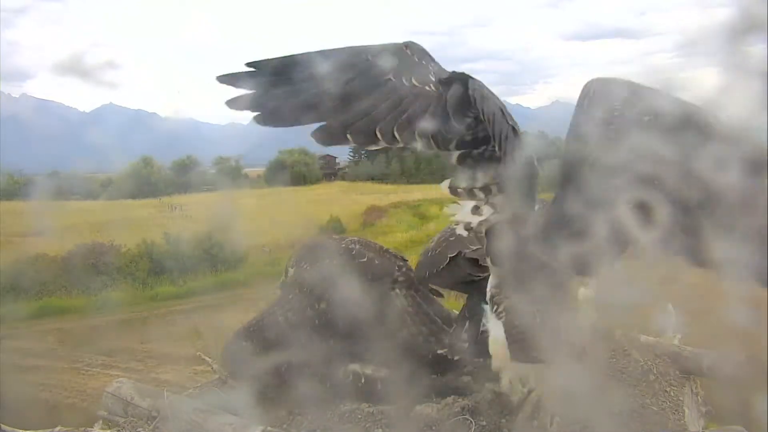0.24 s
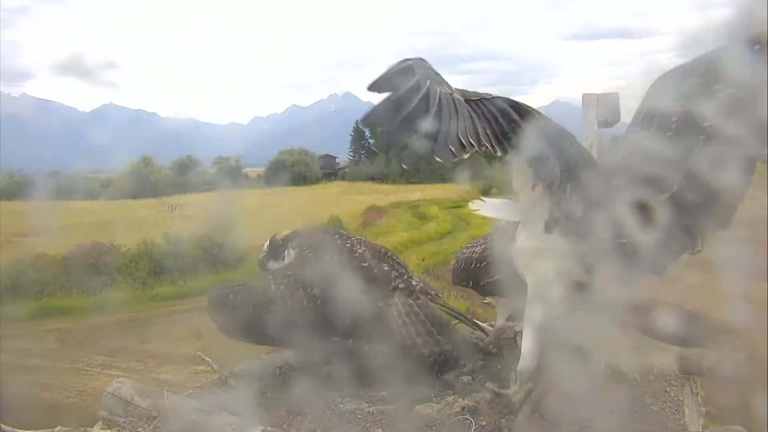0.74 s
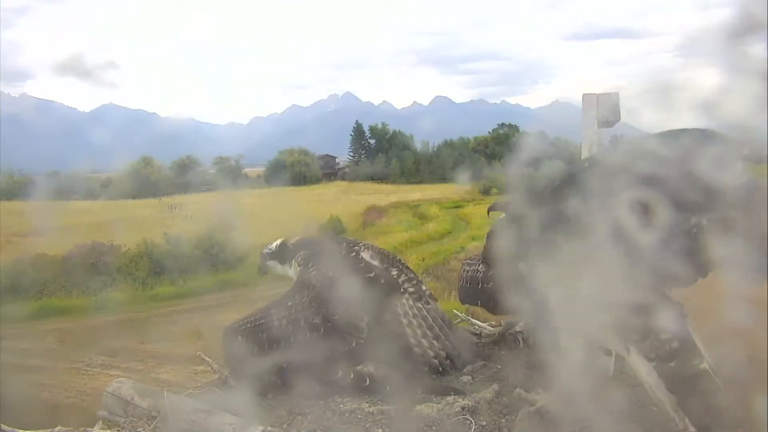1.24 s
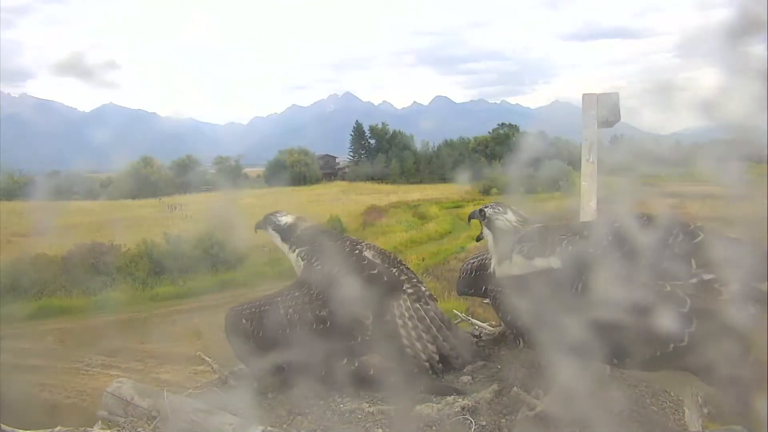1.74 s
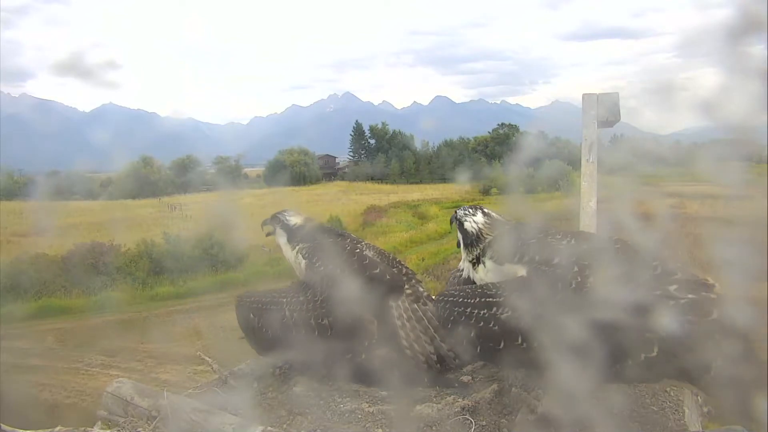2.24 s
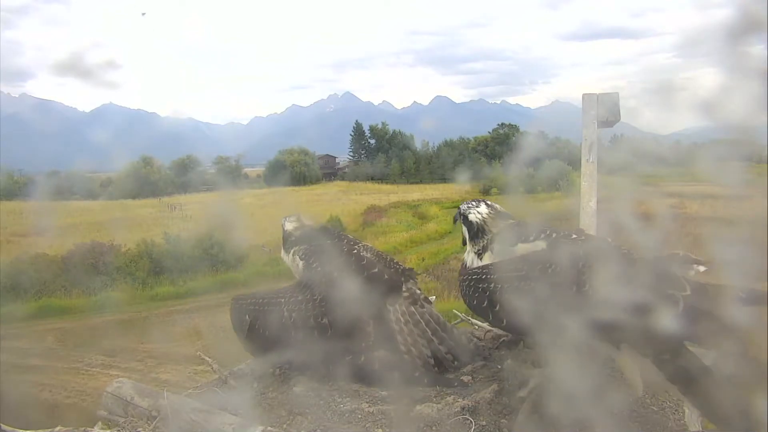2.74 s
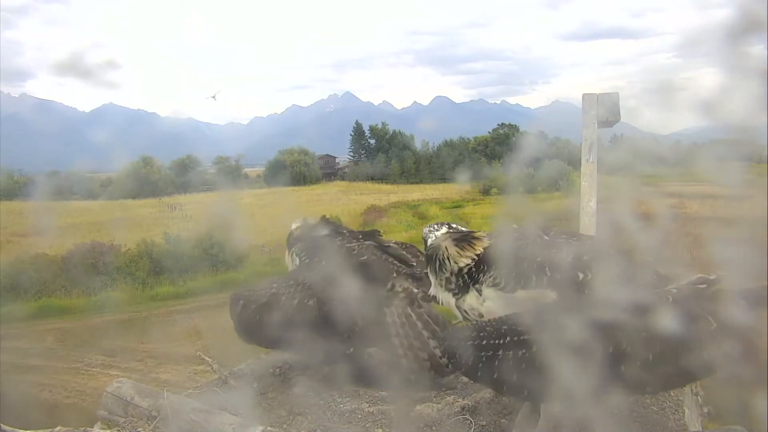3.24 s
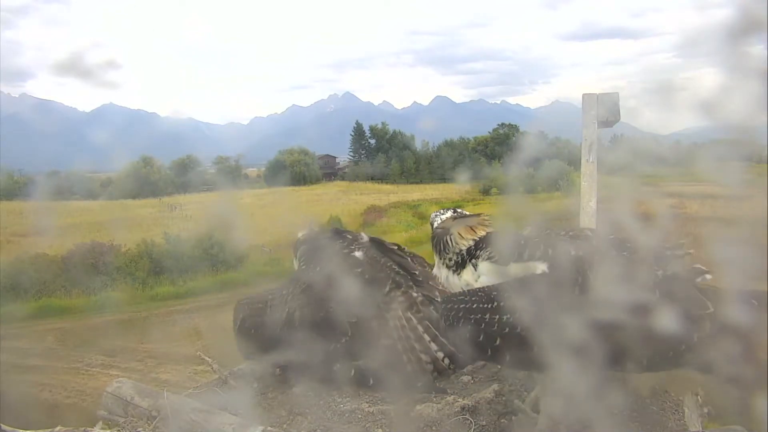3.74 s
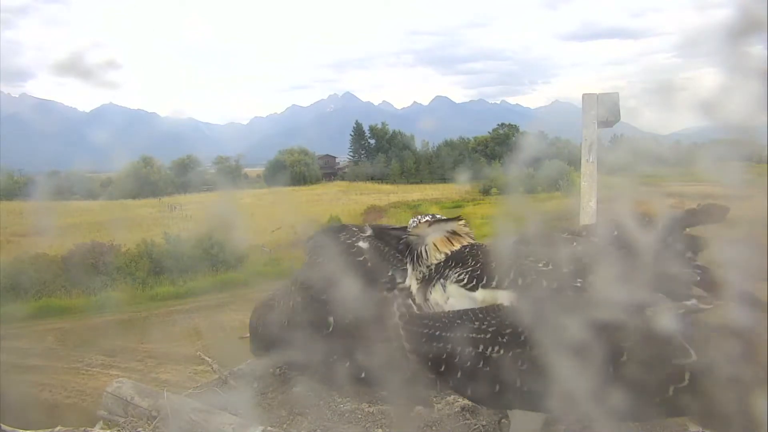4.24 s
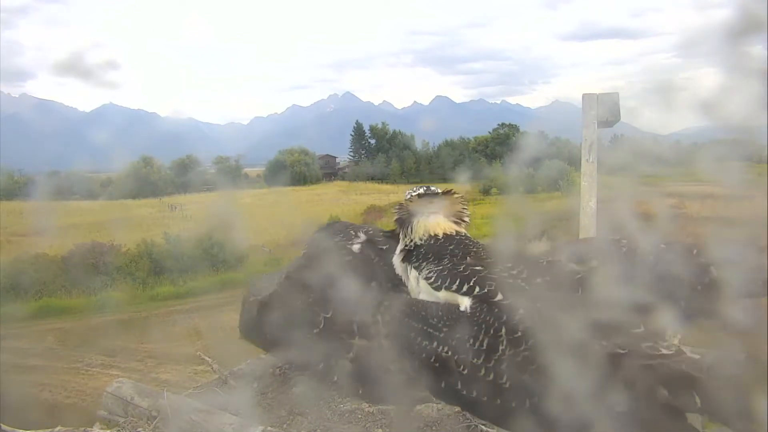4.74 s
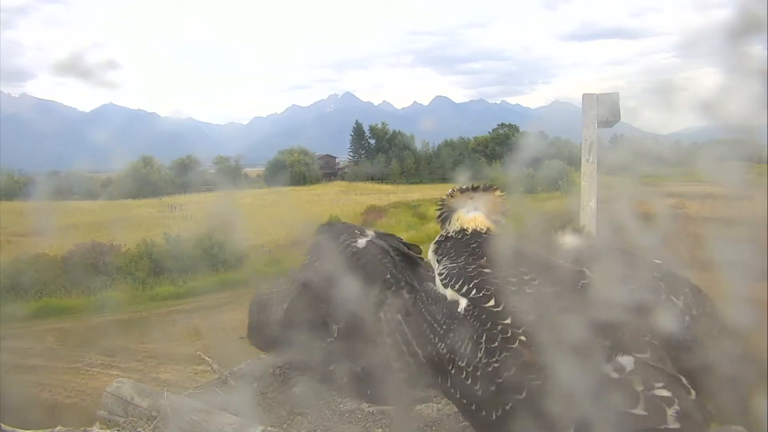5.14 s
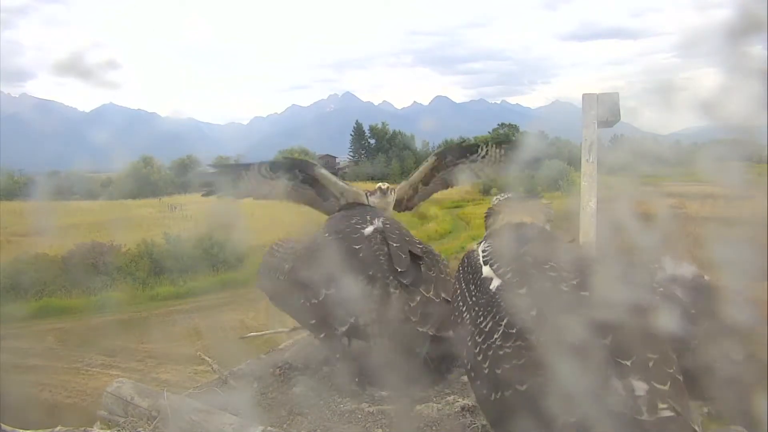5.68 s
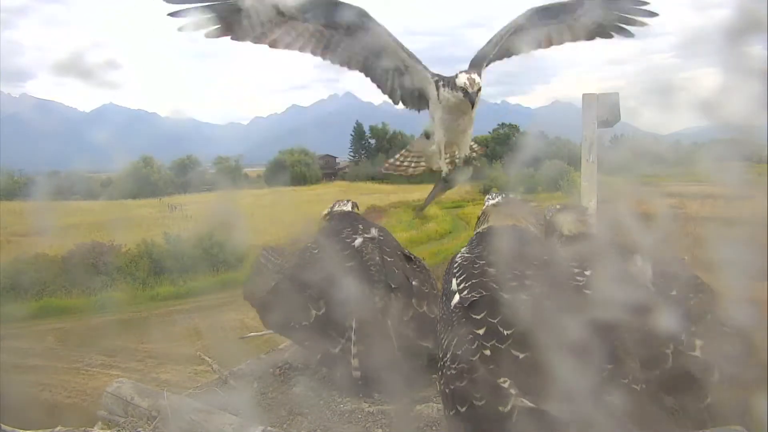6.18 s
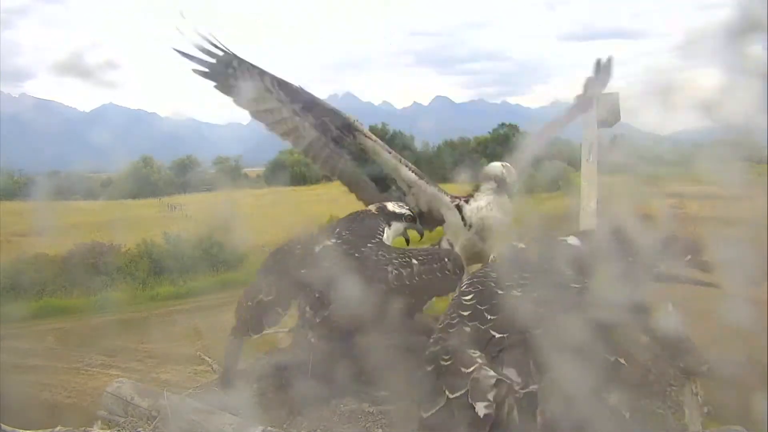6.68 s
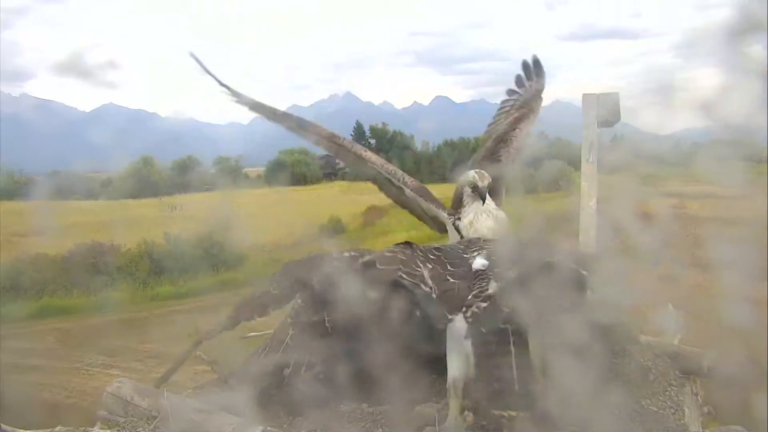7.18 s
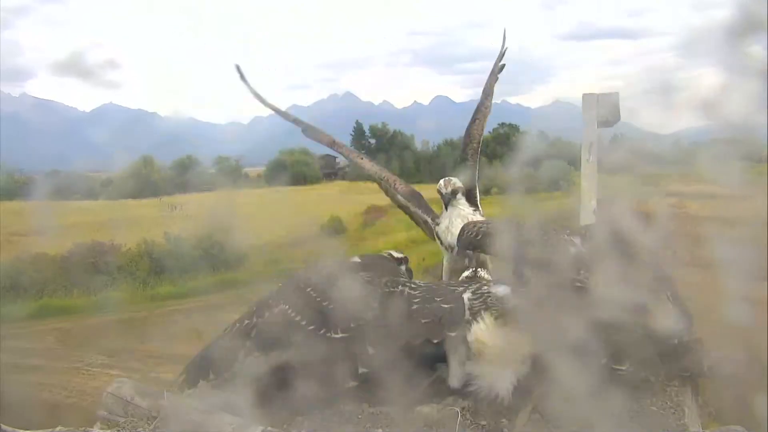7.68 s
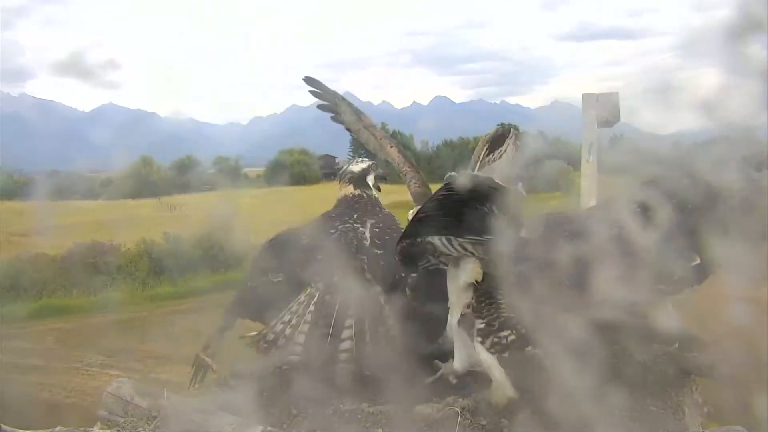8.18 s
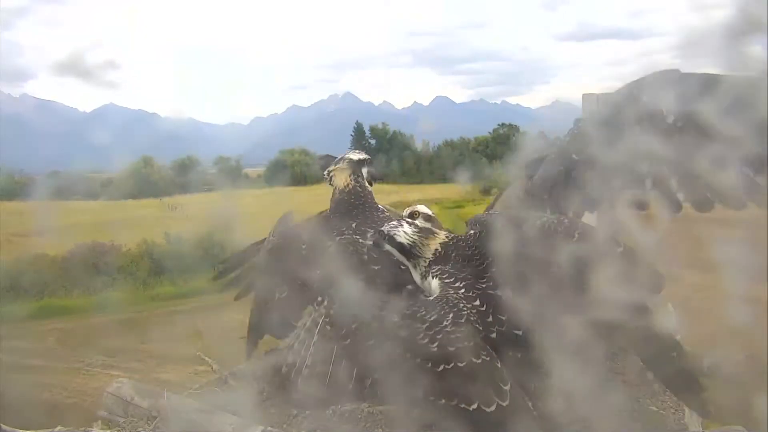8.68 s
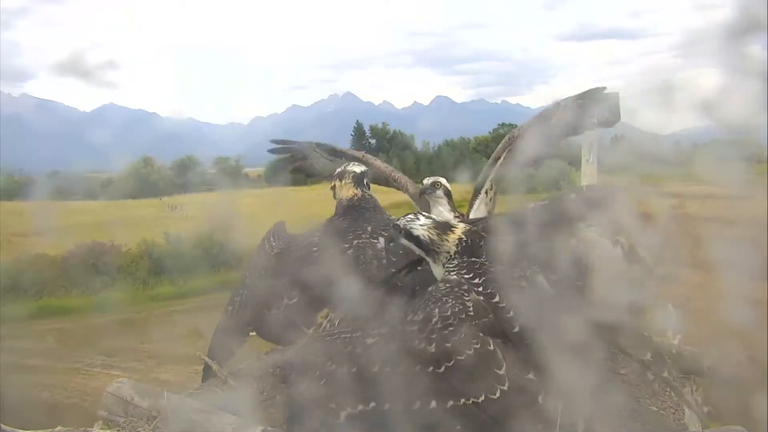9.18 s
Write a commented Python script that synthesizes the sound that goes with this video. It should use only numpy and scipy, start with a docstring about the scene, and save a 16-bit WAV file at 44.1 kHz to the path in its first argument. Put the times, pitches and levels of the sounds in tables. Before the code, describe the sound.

Steady piercing whistles over raspy begging build to a frantic shrill squabble of raptor chicks, then feet and twigs rustle and weak cries trail off.

```python
"""A nest high over open fields: young ospreys beg in clear whistles, hoarse calls and bright screams.
Whistles, cries and squeals are near-sines on bent pitch curves; rasps mix wobbling overtones with
uneven pulses. Feet and wings shuffle as a parent lands, sticks tick and something creaks once: noise,
short knocks and pulses. Filtered noise makes the hiss and the wind rumble at the microphone; the birds
return from the fields as a faint echo."""
import sys
import numpy as np
from scipy import signal
from scipy.fft import rfft, irfft
from scipy.io import wavfile
from scipy.ndimage import uniform_filter1d

SR = 44100
rng = np.random.default_rng(int(sys.argv[2]) if len(sys.argv) > 2 else 0)


def persist_wave(psi):
    """Save psi, clipped to +-1, as 16-bit WAV."""
    counts = np.round(np.clip(psi, -1, 1) * 32767).astype(np.int16)
    wavfile.write(sys.argv[1], SR, np.atleast_2d(counts).T)


N = 415422
EDGE_HZ = 15700  # upper limit of the sound

# clear whistles of the nearest bird: start t/s, end t/s, crest f/Hz, dip f/Hz, top f/Hz,
# crest level/dB, middle level/dB, top level/dB, second harmonic level/dB (against the first)
WHISTLES = [(0.021, 0.376, 3286, 3263, 3493, -22.5, -26, -26, -15.5),
            (0.525, 0.775, 3280, 3227, 3340, -25, -25, -28.5, -22.5),
            (0.897, 1.177, 3260, 3236, 3313, -31, -31.5, -30.5, -14),
            (1.31, 1.694, 3420, 3350, 3447, -30, -31, -27.5, -16.5),
            (1.842, 2.128, 3462, 3398, 3510, -26.5, -26, -28, -15),
            (2.249, 2.567, 3460, 3400, 3497, -28.5, -26.5, -26, -17),
            (2.699, 2.998, 3430, 3373, 3497, -28, -31.5, -29.5, -13),
            (3.125, 3.426, 3430, 3350, 3556, -28.5, -26.5, -29.5, -17.5),
            (3.556, 3.857, 3525, 3420, 3583, -26.5, -26.5, -27.5, -17.5),
            (3.985, 4.261, 3460, 3280, 3440, -27.5, -27.5, -29, -16.5),
            (4.389, 4.713, 3433, 3350, 3504, -27, -31.5, -30, -15),
            (4.85, 5.151, 3404, 3380, 3480, -28, -27.5, -28.5, -14)]
# one uneven, halting whistle at the end: t/s, f/Hz, level/dB
LAST_WHISTLE = [(9.027, 3240, -45), (9.041, 3353, -38), (9.103, 3296, -44.5), (9.135, 3300, -36.5),
                (9.238, 3377, -33), (9.261, 3493, -42.5), (9.311, 3462, -40), (9.34, 3450, -49),
                (9.36, 3460, -40.5), (9.393, 3360, -40.5), (9.405, 3320, -56)]
# moments when the whistle gives way: start t/s, end t/s, level/dB (change)
CRACKS = [(4.027, 4.061, -22), (4.538, 4.596, -6.5), (4.884, 5.113, -9.5)]
# side tones on a whistle: start t/s, end t/s, level/dB (average depth, before it flickers)
SPLITS = [(.09, .15, -19), (.155, .208, -16), (.298, .325, -22), (.6, .675, -24)]
SPLIT_HZ = 1030  # middle of the wandering beat
SCOOP_S, CREST_S, DIP_S = 0.00762, 0.0427, 0.073  # seconds after the start
TOP_S, HOLD_S, DROP_S = 0.087, 0.056, 0.026  # seconds before the end
START_PITCH, SCOOP_PITCH = 0.66, 0.939  # shares of the crest pitch
DROP_PITCH, END_PITCH = 0.97, 0.861  # shares of the top pitch
START_DB, SCOOP_DB, DROP_DB, END_DB = -19.5, -2, 1, -24  # first two against the crest, then the top
LAST_SECOND_DB = -6.5  # second harmonic of the last whistle


def whistles():
    """A scoop to the crest, a dip, a climb and a drop; a second membrane splits the voice at times."""
    out, t = np.zeros(N), np.arange(N) / SR
    for start, end, crest, dip, top, crest_db, middle_db, top_db, second_db in WHISTLES:
        hz, = along([(start, START_PITCH * crest), (start + SCOOP_S, SCOOP_PITCH * crest),
                     (start + CREST_S, crest), (start + DIP_S, dip),
                     (end - TOP_S, top), (end - HOLD_S, top),
                     (end - DROP_S, DROP_PITCH * top), (end, END_PITCH * top)])
        db, = along([(start, crest_db + START_DB), (start + SCOOP_S, crest_db + SCOOP_DB),
                     (start + CREST_S, crest_db), ((start + end) / 2, middle_db),
                     (end - HOLD_S, top_db), (end - DROP_S / 2, top_db + DROP_DB),
                     (end, top_db + END_DB)])
        smooth_hz = uniform_filter1d(hz, size=500, mode="nearest")
        # softer moments are also purer
        tone = voiced(smooth_hz, db, second_db + np.minimum(db - db.max() + 3.5, 0))
        breath = .018 * amp(5.0 * wander(len(tone), 25.0))
        add(out, start, husky(tone, share=breath, ms=.45))
    add(out, LAST_WHISTLE[0][0], voiced(*along(LAST_WHISTLE), LAST_SECOND_DB))

    lost_db = sum(db * ((t > start) & (t < end)) for start, end, db in CRACKS)
    split = sum(amp(db) * ((t > start) & (t < end)) for start, end, db in SPLITS)
    beat_turns = np.cumsum(SPLIT_HZ * (1 + .06 * wander(N, 2.5))) / SR
    beat = np.cos(2 * np.pi * beat_turns) * amp(4.0 * wander(N, 3.0))
    cracked = out * amp(uniform_filter1d(lost_db, size=400))
    return cracked * (1 + uniform_filter1d(split, size=300) * beat)


# the throat pops open before a whistle: t/s
POPS = [.013, .515, .891]


def throat_pops():
    """Each pop is a tone that dies away within a fraction of a millisecond."""
    out, t = np.zeros(N), np.arange(200) / SR
    for s in POPS:
        add(out, s, amp(-30.0) * np.sin(2 * np.pi * 2200 * t) * np.exp(-t / 0.00013))
    return out


# hoarse begging: start t/s, end t/s, rasp level/dB, squeak f/Hz (before it bends),
# squeak level/dB (before it wavers), opening chirp level/dB, closing chirp level/dB
BEGS = [(0.963, 1.138, -40.5, 3810, -82, -57, -32), (1.187, 1.372, -36, 3924, -40, -34, -28),
        (1.418, 1.571, -35, 3857, -31, -23.5, -31.5), (1.616, 1.794, -37.5, 4135, -33, -24.5, -33),
        (1.841, 2.049, -36.5, 4175, -40, -24, -37), (2.102, 2.347, -35.5, 4124, -64, -24, -44),
        (2.416, 2.654, -34.5, 4130, -39.5, -25.5, -41), (2.72, 2.944, -36.5, 4240, -36, -28, -39.5),
        (3.006, 3.202, -38.5, 4125, -39.5, -26, -44), (3.262, 3.455, -38.5, 4190, -41.5, -33, -38),
        (3.51, 3.713, -37.5, 4124, -40.5, -27.5, -36.5), (3.764, 3.933, -39, 4980, -39, -29.5, -38),
        (3.982, 4.162, -39.5, 4885, -37.5, -29, -38.5), (4.217, 4.405, -42, 4940, -42, -35, -41.5),
        (4.455, 4.633, -41, 4520, -42.5, -34, -36), (4.686, 4.863, -43, 4840, -41.5, -32, -34.5),
        (4.915, 5.101, -42, 4860, -60, -32.5, -34.5), (5.146, 5.336, -46.5, 4690, -65, -33.5, -35.5),
        (5.384, 5.568, -44, 4840, -42, -34, -38.5), (5.62, 5.818, -46, 4790, -37.5, -35, -35),
        (5.865, 6.066, -43, 4775, -39.5, -51, -34.5), (6.097, 6.3, -42.5, 4880, -39, -52, -39),
        (6.317, 6.541, -48, 4835, -32.5, -35, -33.5), (6.584, 6.818, -68, 3580, -47.5, -31, -37.5),
        (7.916, 8.355, -48.5, 4674, -50, -33.5, -83)]
# colour of the begging throat: f/Hz, level/dB (relative)
BEG_THROAT = [(500, -32), (1000, -9), (1550, -19), (2300, -14.5), (3000, 7), (3700, -3), (5000, -9),
              (6500, -18), (10000, -26), (15000, -64)]
# how a squeak sags before its top: share of the call, share of the sag
SAG_SHAPE = [(0, .2), (.18, .3), (.38, 1), (.68, 0), (1, 0)]
SQUEAK_SAG, SAG_FROM_HZ = .075, 3800  # largest sag: share per kHz above this pitch
LATE_FROM_S, SQUEAK_LATE = 5.1, .5  # begs after this time start the squeak this far into the call
BEG_CHAOS = .52  # share of unordered pulses in the rasp
LOW_VOICE_HZ, LOW_VOICE_DB = 2408, -8  # pitch before it arches; level against the rasp
YELP_IN_DB, YELP_OUT_DB = -3.5, 4.5  # against the rasp


def begging():
    """A click, a rising chirp, a rasp and low voice under a squeak, yelps at both ends, a falling chirp."""
    out, t = np.zeros(N), np.arange(200) / SR
    for start, end, rasp_db, top_hz, squeak_db, open_db, close_db in BEGS:
        squeak_hz = top_hz * arch(end - start - .03, sag=0.3, steep=4.0)
        size = len(squeak_hz)
        progress = np.arange(size) / size
        # the strained voice wobbles
        squeak_hz *= 1 + .018 * uniform_filter1d(wander(size, 20.0), size=300)
        sag = uniform_filter1d(np.interp(progress, *np.transpose(SAG_SHAPE)), size=500)
        squeak_hz *= 1 - SQUEAK_SAG * max(top_hz - SAG_FROM_HZ, 0) / 1000 * sag
        onset = np.clip((progress - SQUEAK_LATE) / .13, 0, 1) if start > LATE_FROM_S else 1

        # the rasp locks to about every fourth cycle of the squeak
        swell = .4 + .6 * fade(size, 30.0)
        body = amp(rasp_db) * rasp(squeak_hz / 4, BEG_THROAT, BEG_CHAOS, swell)
        squeak = whistle_tone(squeak_hz * (.85 + 0.13 * onset), -29.0, waver=0.0096)
        squeak_level = amp(squeak_db + 5.5 * np.tanh(wander(size, 31.0)))
        body += squeak_level * squeak * fade(size, 32.0) * onset
        add(out, start + 0.02, body * fade(size, 20.0))

        low = whistle_tone(LOW_VOICE_HZ * arch(end - start - .03, sag=0.1, steep=3.7), -6.5)
        low = husky(low, share=.75, ms=2.5) * fade(size, 10.0)
        add(out, start + .015, amp(rasp_db + LOW_VOICE_DB) * low)

        yelp_in = whistle_tone(np.linspace(2720, 3050, 1300), -27.5) * fade(1300, 2.5)
        add(out, start + 0.018, amp(rasp_db + YELP_IN_DB) * yelp_in)
        yelp_out = whistle_tone(np.linspace(3050, 2720, 900), -24.0) * fade(900, 2.2)
        add(out, end - .045, amp(rasp_db + YELP_OUT_DB) * yelp_out)

        opening = whistle_tone(np.linspace(1950, 2350, 1100), -7.0) * fade(1100, 23.2)
        add(out, start + 0.0021, amp(open_db) * opening)
        closing = whistle_tone(np.linspace(2350, 1650, 1200), -1.8) * fade(1200, 23.8)
        add(out, end - .027, amp(close_db) * closing)

        # the throat pops open
        click = np.sin(2 * np.pi * 780 * t) * np.exp(-t / 0.011)
        click += amp(9.5) * np.sin(2 * np.pi * 1700 * t) * np.exp(-t / 0.0018)
        add(out, start, amp(-49.0) * click)
    return out


# raspy screams: start t/s, end t/s, level/dB, pulse rate f/Hz (before it arches)
SCREAMS = [(1.3, 1.612, -45, 840), (3.444, 3.552, -49.5, 933), (4.023, 4.064, -37, 1131),
           (4.866, 5.114, -38.5, 1079), (5.255, 5.468, -36.5, 1118), (5.544, 5.727, -35, 1120),
           (5.788, 6.028, -36.5, 1110), (6.084, 6.217, -38.5, 1086), (6.335, 6.502, -37, 1239),
           (6.534, 6.721, -39.5, 1306), (6.734, 6.902, -35.5, 1134), (6.941, 7.104, -41.5, 1210),
           (7.105, 7.204, -46, 1100), (8.031, 8.31, -48.5, 1064)]
# colour of the screaming throat: f/Hz, level/dB (relative)
SCREAM_THROAT = [(1000, -19), (1800, -15), (2700, -0.5), (3500, 5), (4500, -2), (6500, -10), (9000, -14.5),
                 (11000, -22), (15000, -45)]
SCREAM_CHAOS = .44  # share of unordered pulses


def screams():
    """The same kind of rasp as in begging, with a brighter throat and its own pulse rate."""
    out = np.zeros(N)
    for start, end, db, hz in SCREAMS:
        hz = hz * arch(end - start, sag=0.21, steep=6.7)
        swell = .4 + .6 * fade(len(hz), 20.0)
        scream = rasp(hz, SCREAM_THROAT, SCREAM_CHAOS, swell)
        add(out, start, amp(db) * scream * fade(len(hz), 3.0))
    return out


SMEAR, SMEAR_MS = 1.05, 4.5  # phase smear in rad before loosening; its smoothing time in ms
FLICKER_DB = 5.5  # typical flicker of each overtone


def rasp(hz, throat, chaos, swell):
    """Membranes near chaos lock and slip: flickering overtones mixed with pulses out of step."""
    size = len(hz)
    turns = np.cumsum(hz * (1 + .011 * wander(size, 6.0) + .014 * wander(size, 30.0))) / SR
    loose = 1 + .7 * np.tanh(wander(size, 18.0))
    bands = 0
    for k in range(1, 16):
        smear = SMEAR * loose * wander(size, SMEAR_MS)
        flicker = amp(FLICKER_DB * wander(size, 16.2))
        # high overtones need more effort, so they come late and leave early
        effort = swell ** (.12 * k)
        bands = bands + np.cos(2 * np.pi * k * turns + smear) * flicker * effort * min(k / 3, 1)
    slips = np.cumsum(hz * np.clip(1 + 0.45 * wander(size, 1.0), .2, 3)) / SR
    pulses = np.diff(np.floor(slips), prepend=0) * (1 + 0.32 * rng.standard_normal(size)) * swell
    mixed = (1 - chaos) * evened(bands) + chaos * np.sqrt(loose) * evened(pulses)
    return evened(colour(mixed, throat))


# freer cries of the other birds, short or long: start t/s, dip t/s, top t/s, length t/s (from the start),
# crest f/Hz, dip f/Hz, top f/Hz, end f/Hz, crest level/dB, dip level/dB, top level/dB,
# second harmonic level/dB (against the first, at the loudest point)
CRIES = [(2.123, 0.1, 0.16, 0.22, 3945, 3915, 4110, 3500, -35.5, -40.5, -33, -20),
         (3.175, .11, .28, .4, 2420, 2375, 2705, 2615, -37, -35, -36, -10),
         (4.738, 0.12, 0.32, 0.39, 2753, 2490, 2596, 2330, -37.5, -38.5, -33.5, -22),
         (4.874, 0.063, 0.25, 0.24, 4300, 4370, 4480, 4530, -61, -37, -34.5, -21),
         (5.24, .075, .21, .248, 2710, 2480, 2610, 2350, -42, -36, -40, -40),
         (5.246, 0.086, 0.25, 0.2, 4850, 4340, 4630, 4430, -35, -31.5, -38.5, -20),
         (5.569, 0.072, 0.094, 0.17, 4480, 4210, 4420, 3700, -35, -30.5, -32.5, -14),
         (5.801, .071, .17, .203, 4490, 4120, 4520, 4100, -26.5, -31.5, -28, -22),
         (6.095, .07, .105, .148, 4300, 3950, 4200, 3850, -28, -32, -29, -20),
         (6.328, .067, .112, .177, 5090, 4420, 5150, 4400, -29, -37, -32, -23),
         (6.577, 0.058, 0.068, 0.16, 5340, 5170, 5870, 5850, -28, -34.5, -39, -31),
         (6.729, .125, .343, .458, 2550, 2190, 2455, 2320, -32, -49, -40, 1.5),
         (6.735, 0.11, 0.18, 0.2, 4846, 4610, 4470, 4480, -24, -30, -47, -22.5),
         (7.15, 0.07, 0.1, 0.21, 3390, 3136, 3172, 3010, -42.5, -41, -39, -2),
         (7.474, 0.076, 0.146, 0.14, 2910, 2630, 2710, 2760, -45.5, -59, -47, -21),
         (7.612, 0.041, 0.073, 0.12, 2020, 2020, 2196, 1840, -51.5, -44, -35, -4.5),
         (7.935, 0.13, 0.26, .415, 3840, 3760, 4530, 4270, -42.5, -41, -40.5, -36),
         (8.863, 0.067, 0.34, 0.55, 2330, 2130, 2450, 2050, -49, -57, -51, -27),
         (8.87, 0.061, 0.24, 0.54, 2920, 2670, 2994, 2500, -44.5, -57, -43, -22)]
CRY_CREST_S, CRY_START_PITCH = .03, 0.94  # crest after the start; start as a share of the crest
CRY_START_DB, CRY_END_DB = -6, -9  # against the crest and the top
CLIMB, FALL = 1.7, 2.8  # bend of the climb and of the fall (1 = straight)
BRIGHTEN = 0.087  # dB of second harmonic per dB of effort
FLUTTER_FROM_S, FLUTTER_DB = 8.8, 5  # tired cries after this time flutter by up to this much
FLUTTER_HZ, FLUTTER_SPREAD_HZ = 95.2, 34  # middle of the flutter rate and how far it wanders
HUSK, HUSK_FROM_HZ = .28, 3700  # noise share of cries whose crest is above this: they are strained
HOARSE_FROM_S, HOARSE_PER_KHZ = 7.9, .6  # a tired voice grows hoarser as it climbs


def cries():
    """Crest, dip, a climb that levels off at the top, a fall that steepens."""
    out = np.zeros(N)
    for (start, dip_s, top_s, length, crest, dip, top, last,
         crest_db, dip_db, top_db, second_db) in CRIES:
        # columns: time, opening pitch, climb left, share fallen, level
        opening, left, fallen, db = along([
            (0, CRY_START_PITCH * crest, 1, 0, crest_db + CRY_START_DB),
            (CRY_CREST_S, crest, 1, 0, crest_db),
            (dip_s, dip, 1, 0, dip_db),
            (top_s, dip, 0, 0, top_db),
            (length, dip, 0, 1, top_db + CRY_END_DB)])
        hz = opening + (top - dip) * (1 - left ** CLIMB) + (last - top) * fallen ** FALL
        if start > FLUTTER_FROM_S and crest > 2500:
            rate = FLUTTER_HZ + FLUTTER_SPREAD_HZ * wander(len(db), 25.0)
            depth = FLUTTER_DB * np.tanh(1 + wander(len(db), 60.0))
            db += depth * np.sin(2 * np.pi * np.cumsum(rate) / SR)
        brightness = second_db + BRIGHTEN * (db - db.max())
        cry = voiced(hz, db, brightness, torn=torn_at(start)) * fade(len(hz), 4.0)
        if crest > HUSK_FROM_HZ:
            climb_khz = np.maximum(hz - HUSK_FROM_HZ, 0) / 1000
            hoarse = HOARSE_PER_KHZ * climb_khz * (start > HOARSE_FROM_S)
            cry = husky(cry, share=HUSK + hoarse, ms=2.2)
        add(out, start, cry)
    return out


# squeals: start t/s, end t/s, start f/Hz, middle f/Hz, end f/Hz, start level/dB, end level/dB,
# second harmonic level/dB (against the first)
SQUEALS = [(0, 0.151, 2890, 2860, 2850, -41, -37, -4.5), (0.008, 0.034, 2240, 2420, 2770, -45, -30, -14.5),
           (0.516, 0.535, 2120, 2380, 2720, -64, -32, -13), (0.986, 1.135, 2740, 3130, 2960, -35, -50, -39),
           (1.185, 1.223, 1804, 2060, 2210, -37.5, -28.5, -9.5),
           (1.209, 1.259, 2760, 2985, 3060, -36, -24, -37), (2.091, 2.46, 2530, 2760, 3005, -42, -34, -23),
           (2.059, 2.446, 2055, 2290, 2460, -60, -44, -11), (3.147, 3.195, 2970, 3090, 2950, -40, -31, -20),
           (3.584, 3.845, 2520, 2670, 2760, -45, -41, -14.5),
           (3.871, 3.92, 4150, 3740, 2600, -40, -29, -34), (4.064, 4.086, 2280, 2440, 2610, -40, -25, -16),
           (4.229, 4.262, 3570, 3760, 3660, -32, -36.5, -39),
           (4.353, 4.389, 4040, 3840, 3360, -35, -32, -25),
           (4.145, 4.578, 2315, 2612, 2590, -36.5, -38.5, -18.5),
           (4.705, 4.757, 4310, 4170, 3800, -48, -55, -27),
           (5.005, 5.067, 4500, 4770, 4640, -33, -31.5, -36),
           (5.22, 5.237, 4430, 4860, 3420, -48, -39, -29),
           (5.256, 5.329, 2800, 3550, 3100, -33.5, -37.5, -17),
           (5.442, 5.469, 3510, 3270, 2960, -34.5, -34.5, -2),
           (5.546, 5.59, 2690, 3270, 3550, -35.5, -32.5, -6),
           (5.588, 5.616, 2330, 2530, 2740, -33, -33, -20),
           (5.703, 5.735, 2980, 2610, 2280, -30.5, -41, -31),
           (5.834, 5.864, 2460, 2470, 2660, -34, -36, -22),
           (5.775, 5.804, 3960, 3400, 2380, -44, -26.5, -15),
           (5.869, 5.976, 3400, 3216, 3460, -35.5, -35, -32),
           (5.997, 6.016, 3260, 2990, 2710, -31, -29, -18),
           (6.021, 6.046, 3690, 3090, 2200, -45, -28.5, -18), (6.057, 6.1, 3280, 3480, 3620, -36, -40, -34),
           (6.088, 6.15, 3270, 3125, 3520, -30, -28, -28), (6.177, 6.2, 4980, 5150, 5200, -35, -31, -21),
           (6.228, 6.258, 4910, 4900, 4480, -38, -30, -26), (6.25, 6.29, 3710, 3170, 2220, -42, -30, -21),
           (6.286, 6.351, 3520, 3790, 2800, -39, -32.5, -29),
           (6.288, 6.331, 3100, 3170, 2600, -53, -26.5, -21),
           (6.345, 6.486, 3180, 3170, 3280, -32.5, -33, -15.5),
           (6.501, 6.59, 3700, 3570, 3440, -40, -39, -18), (6.501, 6.529, 3810, 3140, 2440, -27, -29, -26),
           (6.554, 6.584, 3830, 4160, 4230, -36, -27.5, -36), (6.76, 6.79, 3450, 3620, 2600, -35, -43, -25),
           (6.879, 6.91, 3390, 3290, 2930, -37, -50, 1), (6.932, 6.966, 5160, 4070, 3440, -31, -42, -23),
           (7.081, 7.101, 3170, 3260, 3420, -32, -29.5, -12),
           (7.086, 7.195, 3830, 4140, 4340, -38.5, -42, -12.5),
           (7.17, 7.196, 2570, 2750, 2870, -51, -44, -20), (7.258, 7.313, 4350, 4790, 4880, -41, -44, -19),
           (7.379, 7.421, 3600, 3370, 2980, -49.5, -48.5, -12),
           (7.882, 7.934, 2850, 2900, 2690, -51, -41.5, -23),
           (7.878, 7.934, 2160, 2310, 2150, -53, -50, -14),
           (7.93, 7.986, 2660, 2820, 2500, -32.5, -43, -16), (7.985, 8.33, 2796, 2694, 2510, -45, -69, -7),
           (8.334, 8.487, 2520, 2490, 2190, -49.5, -62, -12),
           (8.223, 8.312, 3150, 3180, 3200, -39, -38.5, -9.5),
           (8.284, 8.361, 3250, 3320, 2990, -59, -28.5, -12),
           (8.351, 8.485, 3070, 3030, 2460, -44, -61.5, -8), (9.0, 9.425, 2230, 2200, 1920, -54, -70, -15),
           (7.339, 7.458, 3090, 2980, 2650, -46, -64, -13), (5.464, 5.482, 4940, 4100, 3450, -41, -34, -32),
           (0.159, 0.166, 2850, 2700, 2540, -42, -47, 10)]


def squeals():
    """Each squeal, listed or random, is one bent glide in pitch and a straight one in level."""
    out = np.zeros(N)
    for start, end, first, middle, last, first_db, last_db, second_db in SQUEALS + chatter(count=55):
        u = np.linspace(0, 1, round((end - start) * SR))
        bow = (middle - (first + last) / 2) * (1 - (2 * u - 1) ** 2)
        hz = first + (last - first) * u + bow
        db = first_db + (last_db - first_db) * u
        add(out, start, voiced(hz, db, second_db, torn=torn_at(start)) * fade(len(u), 5.0))
    return out


CHATTER_S, CHATTER_HZ = (4.7, 6.72), (2600, 4900)  # span of start times, span of pitches
CHATTER_GLIDE, CHATTER_DB = .22, -37.5  # largest glide as a share of the pitch; loudest level


def chatter(count):
    """Rows of short steep squeals at random, mostly falling: birds talking over each other."""
    when, pitch, glide, length, strength = rng.random((count, 5)).T
    start, hz = np.interp(when, (0, 1), CHATTER_S), np.interp(pitch, (0, 1), CHATTER_HZ)
    bend = CHATTER_GLIDE * (2 * glide ** 2 - 1)
    db = CHATTER_DB - 10 * strength
    end = start + (1 + 2 * length) / 70  # 14 to 43 ms long
    first, middle, last = hz * (1 - bend / 2), hz * (1 + abs(bend) / 10), hz * (1 + bend / 2)
    return list(zip(start, end, first, middle, last, db, db, db / 2))


# feet and wings shuffling on the nest: t/s, level/dB
SHUFFLE = [(6.402, -68), (6.62, -55.5), (6.9, -73.5), (7.3, -52.5), (7.5, -58), (7.65, -48), (7.77, -56),
           (7.797, -48), (7.83, -58.5), (8.3, -59), (8.499, -66), (8.999, -64.5), (9.42, -61.5)]
# sticks: t/s, level/dB (of the tick), knock f/Hz, snap level/dB (against the knock)
TICKS = [(6.605, -41, 700, 3), (6.629, -52, 151, -3), (7.077, -45, 361, -9), (7.255, -51, 210, -11),
         (7.285, -44, 154, -1), (7.326, -37.5, 236, -7), (7.392, -45.5, 151, 13), (7.618, -39, 390, -13),
         (7.639, -43, 185.2, -10), (7.694, -36.5, 596, -6), (7.708, -39, 382, 6), (7.764, -48.5, 155.6, 17),
         (7.794, -46, 574, 11), (7.828, -41, 150, -11), (8.224, -42, 330, -13), (8.518, -51, 172, -14),
         (8.569, -47.5, 260, 1), (8.839, -47, 225, -18), (8.984, -45, 200, 3), (9.015, -42.5, 245, 0),
         (9.032, -47, 320, 11), (9.064, -46, 340, 8), (9.213, -43, 360, 4), (9.232, -52.5, 188, 16)]
# one creak: t/s, level/dB, pulse rate f/Hz (before it wavers)
CREAK = [(8.041, -48, 182.4), (8.071, -41.5, 221.6), (8.167, -57.5, 245)]


def nest():
    """Grainy noise shuffles, dying knocks with a noise snap tick, and slipping pulses creak."""
    out = np.zeros(N)
    db, = along(SHUFFLE)
    size = len(db)
    lumps_db = 4.0 * wander(size, 2.5) + 2.5 * wander(size, 35.0)
    grains = rng.standard_normal(size) * amp(lumps_db)
    shuffle = colour(grains, [(100, -15.0), (280, -6.5), (1000, -10.0), (5000, -17.5), (15000, -31.0)])
    add(out, SHUFFLE[0][0], amp(db) * evened(shuffle))

    t = np.arange(1800) / SR
    for s, db, hz, snap_db in TICKS:
        knock = np.sin(2 * np.pi * hz * t) * np.exp(-t * hz / 1.36)
        snap = uniform_filter1d(rng.standard_normal(1800), size=3) * np.exp(-t / 0.00089)
        add(out, s, amp(db) * (knock + amp(snap_db) * snap))

    db, hz = along(CREAK)
    turns = np.cumsum(hz * (1 + 0.018 * wander(len(hz), 3.7))) / SR
    slips = np.diff(np.floor(turns), prepend=0)
    creak = colour(slips, [(120, -26), (230, 24.5), (450, 9), (700, 1),
                           (1400, 13.5), (2500, 13.5), (6000, -40)])
    add(out, CREAK[0][0], amp(db) * evened(creak) * fade(len(db), 10.0))
    return out


def fields(x):
    """Scattered returns from ground and trees: a noise tail that builds late, then dies away."""
    t = np.arange(SR // 2) / SR
    tail = rng.standard_normal(len(t)) * (1 - np.exp(-t / 0.12)) * amp(-60 * t / 0.63)
    return signal.fftconvolve(x, tail / np.linalg.norm(tail))[:N]


# colour of the steady hiss: f/Hz, level/dB (relative, per Hz)
AIR = [(15, -51), (25, -32), (116, 0), (368, -10), (997, -15), (1900, -19), (3260, -18), (3720, -26.5),
       (6550, -16.5), (15500, -47)]
# strength of the wind rumble: t/s, level/dB
WIND = [(0.0, -70.5), (2.23, -62.5), (6.61, -63), (7.79, -54), (8.69, -67.5), (9.42, -64)]


def air():
    """Filtered noise: a steady country hiss, and low wind whose level rises and falls."""
    hiss = amp(-64.5) * evened(colour(rng.standard_normal(N), AIR))
    s, db = np.transpose(WIND)
    low_noise = colour(rng.standard_normal(N),
                       [(15, -20.0), (40, -3.5), (110, -1.0), (200, -21.0), (500, -38.0)])
    return hiss + amp(np.interp(np.arange(N) / SR, s, db)) * evened(low_noise)


def voiced(hz, db, second_db, torn=0):
    """One note; the higher, the shakier in pitch and level."""
    strain = min((hz.mean() / 3300) ** 2.5, 4.0)
    tone = whistle_tone(uniform_filter1d(hz, 300), second_db, waver=0.0018 * strain, torn=torn)
    return amp(db + 0.64 * strain * wander(len(hz), 7.3)) * tone * fade(len(hz), 0.95)


def whistle_tone(hz, second_db, waver=0.0022, torn=0):
    """Four harmonics, usually nearly a sine; the higher ones tear first."""
    turns = np.cumsum(hz * (1 + waver * wander(len(hz), 7.0))) / SR
    levels_db = [0, second_db, 1.13 * second_db - 14.0, 0.11 * second_db - 37]
    tone = 0
    for k, db in enumerate(levels_db, 1):
        overtone = husky(np.sin(2 * np.pi * k * turns), share=torn * k, ms=2.7)
        tone = tone + amp(db) * overtone * (k * hz < EDGE_HZ)
    return np.sqrt(2) * tone


def husky(tone, share, ms):
    """Part of a tone breaks up into a band of noise around it."""
    share = np.clip(share, 0, 1)
    return tone * (np.sqrt(1 - share ** 2) + share * wander(len(tone), ms))


TORN, TORN_FROM_S, TORN_TO_S = .3, 3.8, 7.14  # noise share per harmonic number, and when


def torn_at(start):
    """At the height of the excitement voices tear."""
    return TORN * (TORN_FROM_S < start < TORN_TO_S)


def arch(s, sag, steep):
    """Pitch factor over a call of s seconds: up at the start, down at the end."""
    u = np.linspace(-1, 1, round(s * SR))
    return 1 - sag * abs(u - .1) ** steep


def amp(db):
    """Decibels to a plain factor."""
    return 10 ** (np.asarray(db) / 20)


def evened(x):
    """Scales a sound to an average strength (rms) of 1."""
    return x / np.sqrt(np.mean(x ** 2) + 1e-20)


def add(mix, s, sound):
    """Adds a sound into the mix at s seconds."""
    part = mix[round(s * SR):][:len(sound)]
    part += sound[:len(part)]


def colour(x, points):
    """Filters by a spectrum of (f/Hz, level/dB) points."""
    f, db = np.transpose(points)
    hz = np.fft.rfftfreq(len(x), 1 / SR)
    return irfft(rfft(x) * amp(np.interp(np.log(hz + 1), np.log(f), db)), len(x))


def along(curve):
    """Each column of a curve, sample by sample."""
    s, *columns = np.transpose(curve)
    t = np.arange(s[0], s[-1], 1 / SR)
    return [np.interp(t, s, c) for c in columns]


def fade(size, ms):
    """Soft edges of the given length."""
    k = np.arange(size)
    return np.sin(np.pi / 2 * np.clip(np.minimum(k, k[::-1]) / (ms * SR / 1000), 0, 1)) ** 2


def wander(size, ms):
    """Random drift of rms 1: noise smoothed twice; a longer ms is slower."""
    span = max(int(ms * SR / 1400), 1)
    return evened(uniform_filter1d(uniform_filter1d(rng.standard_normal(size), span), span))


def scene():
    """Birds, their faint echo, nest and air."""
    birds = whistles() + throat_pops() + begging() + screams() + cries() + squeals()
    return (birds + amp(-39.0) * fields(birds) + nest() + air())[None]


def record(dry):
    """Cuts everything above the upper limit."""
    band = signal.firwin(511, EDGE_HZ, window=("kaiser", 9), fs=SR)
    return signal.oaconvolve(dry, band[None], "same")


dry = scene()
out = record(dry)
persist_wave(out)
```